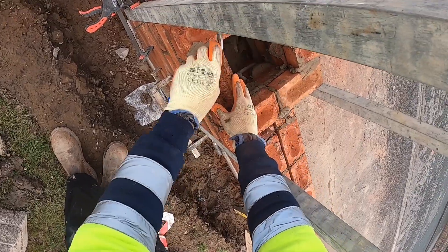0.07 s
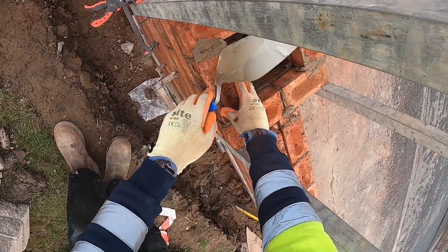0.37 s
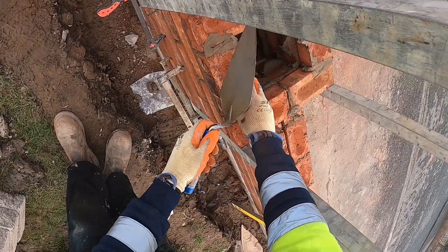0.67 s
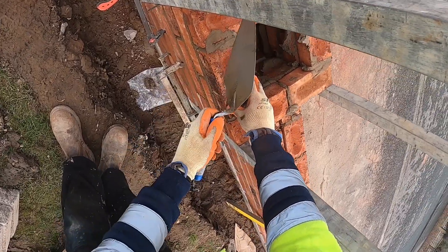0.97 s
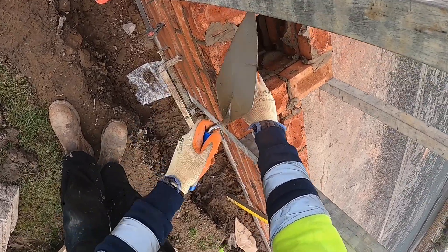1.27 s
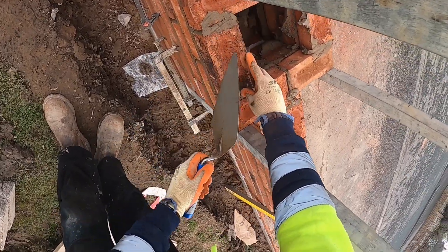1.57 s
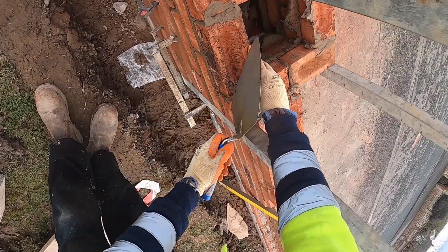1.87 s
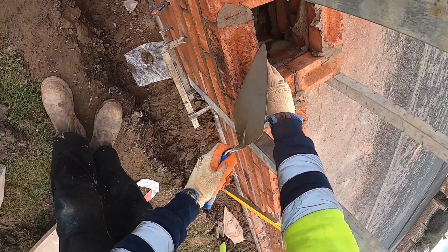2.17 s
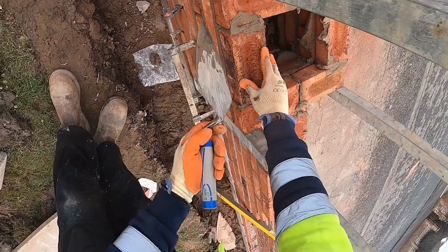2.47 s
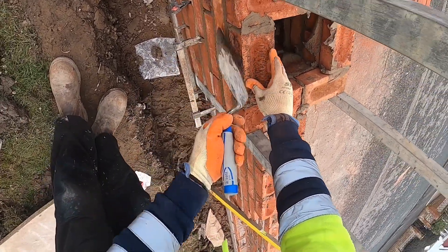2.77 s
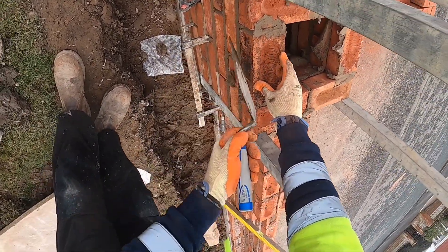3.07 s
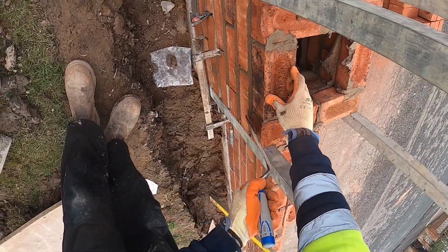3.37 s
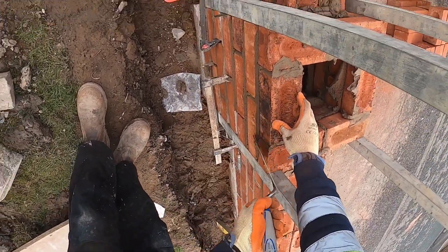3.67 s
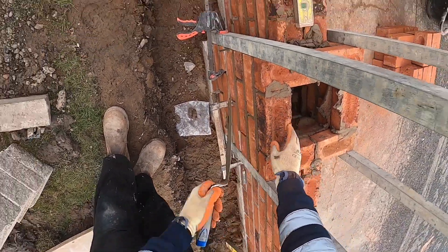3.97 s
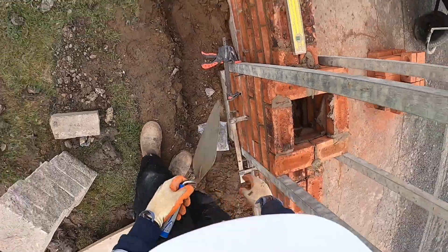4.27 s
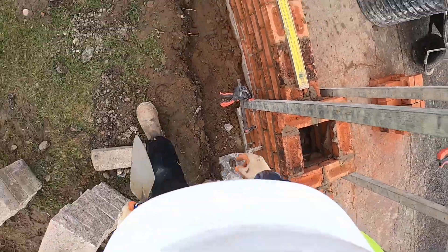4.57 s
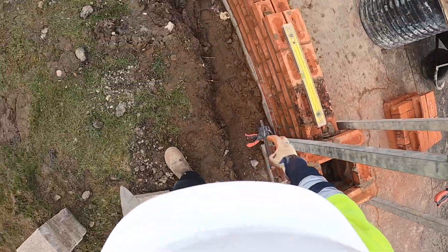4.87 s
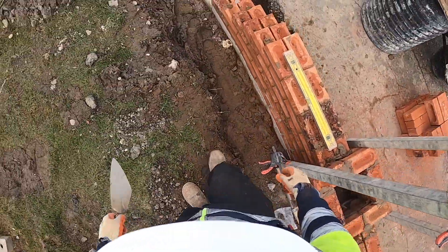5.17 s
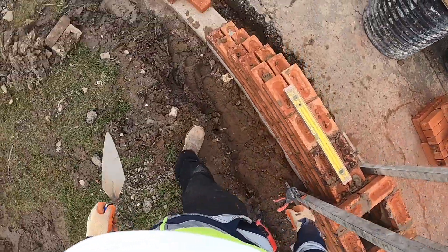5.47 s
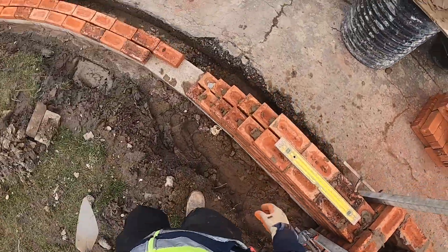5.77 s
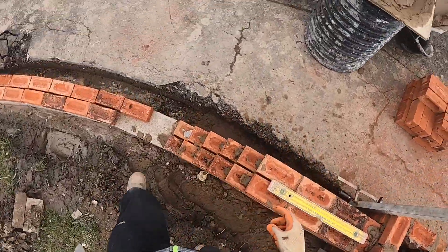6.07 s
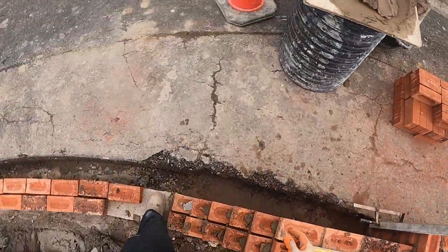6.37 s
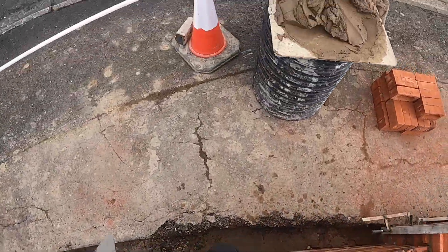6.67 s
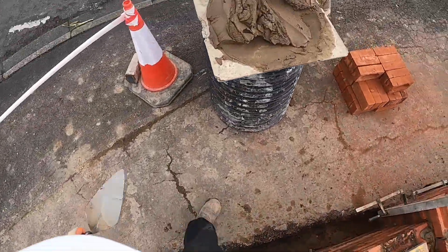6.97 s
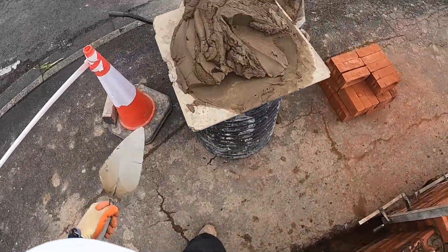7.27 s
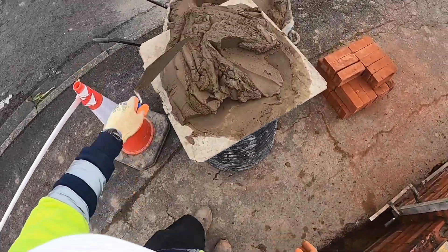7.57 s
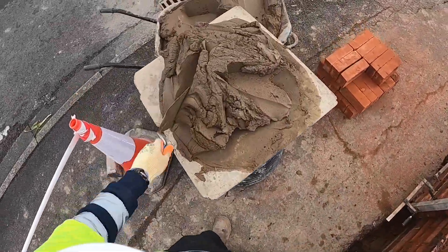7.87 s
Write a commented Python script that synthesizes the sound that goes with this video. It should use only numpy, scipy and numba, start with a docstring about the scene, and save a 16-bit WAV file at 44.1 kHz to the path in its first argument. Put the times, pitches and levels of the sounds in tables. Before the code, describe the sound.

An outdoor building site is heard from a body-worn microphone, with a low rumble of air and faint distant traffic throughout. After a soft rustle of clothing, a steel trowel taps a brick close by at about 0.9 and 1.1 seconds, then more lightly at 1.9 and 2.1, the blade ringing brightly each time. A small bird chirps faintly three times between 0.8 and 2.4 seconds. Three short, gritty scrapes of steel on brick and sandy mortar come at 2.7, 3.2 and 3.6 seconds, each swelling and then lifting off. A dry knock follows near 4 seconds. From about 4.8 seconds the worker walks, with five dull, low footfalls, the heaviest near 6.4. Grit crunches lightly, small stones and bricks knock, clothes rub and a few faint squeaks pass. Near 7.8 seconds there is a small knock and a very faint sandy crackle as the trowel enters mortar.

```python
"""Four ringing taps: a steel trowel's edge knocks a brick down and the free blade rings on.
Three gritty strokes follow, the edge catching and slipping on sand as it scrapes off spare mortar.
The bricklayer walks to the mortar board: grit crunches, small things knock, clothes rub.
Air and footfalls rumble in the body-worn microphone; distant traffic and a small bird lie behind."""
import sys
import numpy as np
from scipy import signal
from scipy.fft import rfft, irfft, next_fast_len
from scipy.io import wavfile
from numba import njit

SR = 44100
rng = np.random.default_rng(int(sys.argv[2]) if len(sys.argv) > 2 else 0)


def to_wav(sig):
    """Store sig (one row per channel, or 1-D mono) as 16-bit WAV at the path in sys.argv[1].

    Samples outside -1..1 are clipped; the rate is SR.
    """
    pcm = np.clip(np.atleast_2d(sig), -1, 1) * 32767
    pcm = np.round(pcm).astype(np.int16)
    wavfile.write(sys.argv[1], SR, pcm.T)  # frames by channels


N = 353682
T = np.arange(N) / SR

# free blade modes: f/Hz, t60/s, level/dB struck at heel, middle, tip
BLADE_MODES = [(481, 1.7, -49.5, -49, -61), (809, 1.1, -78, -55.5, -75.5), (1045, 0.28, -43.5, -35, -34.5),
               (1210, 0.36, -36, -40, -63), (1237, 0.38, -33, -32, -41), (1293.4, 1.04, -33.5, -40, -27),
               (1470, 0.15, -40.5, -17.5, -29.5), (1610, 0.14, -53, -55, -42),
               (1905, 0.19, -30, -34.5, -57), (1950, 0.23, -24.5, -27, -51.5),
               (2173, 0.19, -27.5, -31.5, -38), (2235, 0.58, -40, -45, -45.5),
               (2418, 0.45, -31.5, -43, -33), (2453, 0.56, -50.5, -41.5, -38),
               (2507, 0.23, -27, -38.5, -50), (2875, 0.36, -55, -45, -60), (3130, 0.17, -24.5, -40, -58.5),
               (3173, 0.28, -42.5, -37, -27.5), (3470, 0.12, -57, -51, -56), (3735, 0.22, -47, -45, -39),
               (4050, 0.26, -62, -55.5, -37.5), (4740, 0.16, -54, -46, -51), (4650, 0.24, -56, -49, -60),
               (4660, 0.077, -52, -44, -27.5), (5087, 0.05, -61.5, -53, -44), (5320, 0.13, -44, -38.5, -63),
               (6700, 0.14, -62.5, -61, -50), (6830, 0.087, -46, -37, -36.5), (6934, 0.11, -51, -53, -45),
               (7600, 0.08, -40.5, -50, -49), (8800, 0.11, -49, -67, -53)]
# trowel taps: t/s, place (0 heel, 2 tip), ring/dB, knock/dB
TROWEL_TAPS = [(0.8981, 0.29, -1, -16.5), (1.1027, 0.97, 1, -15), (1.9481, 1.73, -4.5, -19),
               (2.109, 1.34, -12, -24)]
# steel on brick: f/Hz, level/dB
KNOCK_SPECTRUM = [(100, -13), (250, -16.5), (380, -30), (510, 8), (700, -22.5), (1050, 8.5), (1500, 12.5),
                  (1850, 4), (2700, -10), (4500, -25.5), (8000, -65.5), (15000, -60.5)]
# crushed sand: f/Hz, level/dB
GRIT_SPECTRUM = [(200, -35), (800, -16), (2000, -6), (2750, -6.5), (3300, 13.5), (5200, 4), (7000, -1.5),
                 (8500, -11), (9600, -11.5), (12500, -19.5), (15000, -34.5)]
# brick in its soft bed: f/Hz, level/dB
THUD_SPECTRUM = [(90, -15), (230, 2.5), (380, -13.5), (520, 8), (700, -23), (1500, -40), (6000, -46)]
# edge skids or cuts into mortar: start/s, end/s, level/dB
EDGE_SKIDS = [(2.11, 2.161, -49), (7.81, 8.026, -64.5)]
# scrapes: t/s, push/s, ease/s, peak/dB, swell/dB, sand/dB re pressure, chatter/Hz
SCRAPE_STROKES = [(2.7, 0.14, 0.095, -26, 12, -7, 1700), (3.206, 0.13, 0.06, -27, 14.5, -8, 1760),
                  (3.592, 0.1, 0.032, -28.5, 21.5, -12, 1520)]
# blade damped against the wall: f/Hz, width/Hz, level/dB
PRESSED_MODES = [(516, 52, -13), (1086, 95, -3), (1362, 29, -4.5), (1490, 41, -5), (1774, 200, -3.5),
                 (1927, 59, 3.5), (2440, 130, 0.5), (3155, 170, -2), (3528, 110, -2.5)]
# its upper modes, rung by sharp sand: f/Hz, width/Hz, level/dB
UPPER_MODES = [(4300, 70, 7), (4398, 150, 10.5), (4657, 75, 15), (5084, 120, 9.5), (6820, 220, 5.5),
               (7540, 76, -10.5), (7910, 120, -5.5), (8450, 120, -2)]
# rasp of the brick face: f/Hz, level/dB
RASP_SPECTRUM = [(110, -27), (220, -19), (370, -34), (520, -24), (650, -23.5), (830, -25), (1000, 3),
                 (1800, 3), (2200, -28), (2480, 3), (2750, -22), (3200, 2.5), (6000, -13), (15000, -46)]
# knocks of brick, stones, boots: t/s, level/dB, treble/dB re level
SMALL_KNOCKS = [(0.305, -44, -17), (1.594, -38.5, -35), (3.95, -27.5, -37.5), (5.624, -33, -27.5),
                (5.71, -37, -30.5), (5.975, -43.5, -36), (6.109, -32.5, -38.5), (6.414, -28, -21.5),
                (6.62, -38.5, -35), (6.921, -43.5, -29), (6.975, -37, -24.5), (7.13, -43, -16),
                (7.348, -41.5, -44.5), (7.514, -46.5, -33), (7.608, -44, -37), (7.816, -33, -15.5)]
# footfalls: t/s, jolt/dB, length/s, crunch/dB
FOOTFALLS = [(4.783, -22.5, 0.11, -56.5), (5.6, -11.5, 0.11, -56), (6.415, -8.5, 0.079, -51.5),
             (7.118, -11.5, 0.062, -63.5), (7.712, -16.5, 0.084, -64)]
# gloves, sleeves, trousers: t/s, length/s, level/dB, treble/dB re level
CLOTH_SWISHES = [(-.15, 0.48, -56.5, -4), (0.288, 0.27, -63, -5.5), (3.769, 0.35, -58.5, -9.5),
                 (4.214, .4, -54.5, -12.5), (4.721, 0.3, -57, -14), (5.274, 0.13, -60.5, -17.5),
                 (5.601, .21, -54, -10.5), (6.127, 0.78, -58.5, -10), (6.79, 0.45, -58.5, -15.5),
                 (7.251, 0.047, -52, -13.5), (7.646, 0.059, -52.5, -8.5), (7.694, 0.44, -56, -6.5)]
# fabric rub: f/Hz, level/dB
RUB_SPECTRUM = [(120, -1.5), (350, -28), (510, -2), (760, -24), (1020, -1), (1550, 3), (2000, -10.5),
                (2600, -20), (5000, -60)]
# fabric treble: f/Hz, level/dB
SWISH_SPECTRUM = [(1000, -29.5), (2000, 2.5), (2700, 0.5), (3300, 8), (4000, -6.5), (4800, -3.5),
                  (6500, -28.5), (9000, -37.5), (15000, -61)]
# faint squeaks and whines: t/s, length/s, start/Hz, end/Hz, level/dB
SQUEAKS = [(1.769, 0.039, 3360, 3050, -64), (4.55, 0.21, 2560, 2360, -64.5), (5.66, 0.07, 937, 940, -44),
           (6.2, 0.41, 1565, 1472, -57.5), (6.725, .1, 3500, 3190, -52.5), (7.5, 0.46, 1490, 1270, -51.5)]
# air on the microphone: f/Hz, level/dB
AIR_SPECTRUM = [(12, -3), (24, 5.5), (38, 0.5), (50, -14.5), (66, -10.5), (80, -29.5), (100, -42.5),
                (160, -43.5), (300, -71), (700, -92.5)]
# bird calls: t/s, level/dB
CALLS = [(0.794, -54.5), (1.601, -56.5), (2.349, -58.5)]
# two falling notes per call: delay/s, length/s, start/Hz, end/Hz, level/dB re call
BIRD_NOTES = [(0, .034, 4500, 3920, -9), (0.035, 0.047, 3575, 3074, -1)]
# distant road: f/Hz, level/dB
TRAFFIC_SPECTRUM = [(60, 13.5), (130, -1), (220, -2), (370, -10.5), (510, -7), (760, -18.5), (1030, -3.5),
                    (1300, -1.5), (1540, 5.5), (1900, -8), (2500, -18), (3300, -14.5), (4000, -24.5),
                    (5000, -24.5), (8000, -43), (15000, -63.5)]
# wall backscatter: f/Hz, level/dB
WALL_SCATTER = [(300, -11.5), (1500, -11), (4000, -7), (9000, -2.5)]
# microphone ports: f/Hz, left minus right/dB
PORT_BALANCE_DB = [(100, -2), (450, -4), (750, 4.5), (1100, -1.5), (1300, 0.5), (1480, 1.5), (1750, 1),
                   (1950, 2.5), (2150, 11), (2450, 4), (2800, 13.5), (3150, 4.5), (3650, 14), (3950, -13),
                   (4750, -4.5), (7200, -10), (9000, 3)]
# microphone ports: f/Hz, left lead/rad
PORT_LEAD_RAD = [(100, 1), (1900, -0.64), (2250, -1.67), (3200, 0), (4130, -7.5), (6700, -8.5),
                 (9100, -15.5), (15000, -20)]


def taps():
    """The edge knocks, bounces, chatters and crushes sand; the brick thuds, the free blade rings."""
    chatter_db, chatter_t60_s, crush_db, crush_t60_s = -9, 0.095, -17.5, 0.067
    out = np.zeros(N)
    chatter = unit(colour(grains(rate_hz=1500, spread_db=5), KNOCK_SPECTRUM))
    grit = unit(colour(grains(rate_hz=6500, spread_db=4.5), GRIT_SPECTRUM))
    thud = unit(colour(noise(), THUD_SPECTRUM))
    knock = pulse(KNOCK_SPECTRUM)
    sand = skids()
    for at_s, place, ring_db, knock_db in TROWEL_TAPS:
        add(out, at_s, undb(ring_db) * blade_ring(at_s, place))
        for bounce, delay_s in enumerate(np.cumsum([0, *rng.uniform(0.0016, 0.0045, size=3)])):
            add(out, at_s + delay_s, undb(knock_db - 4.1 * bounce) * knock)
        out += undb(knock_db + chatter_db) * chatter * fade(at_s, chatter_t60_s)
        out += undb(0.23 * ring_db - 42.5) * thud * fade(at_s, t60_s=0.16)
        sand += undb(knock_db + crush_db) * grit * fade(at_s, crush_t60_s)
    sand_ring = signal.fftconvolve(sand, shimmer(count=45))[:N]
    return out + undb(-5.5) * sand + undb(-12) * sand_ring


def blade_ring(at_s, place):
    """Modes weighted by strike place; they build during the bounces, the next tap stills them."""
    build_s, still_s = 0.0036, 0.0044
    ring, t = 0, T[:2 * SR]
    for hz, t60_s, *levels_db in BLADE_MODES:
        gain = undb(np.interp(place, [0, 1, 2], levels_db))
        ring += gain * np.exp(-np.log(1000) * t / t60_s) * np.sin(2 * np.pi * (hz * t + rng.random()))
    ring *= 1 - np.exp(-t / build_s)
    for tap_s, *_ in TROWEL_TAPS:
        if tap_s > at_s:
            ring *= 1 - np.clip((at_s + t - tap_s) / still_s, 0, 1)
    return ring


def shimmer(count):
    """High, short-lived blade modes; unit energy."""
    t, t60_s = T[:SR // 4], 0.14
    hz, phase = rng.uniform(3000, 9500, (count, 1)), rng.random((count, 1))
    modes = np.sin(2 * np.pi * (hz * t + phase)).sum(axis=0)
    return unit_energy(modes * np.exp(-np.log(1000) * t / t60_s))


def skids():
    """Light contact: sand crackles under the steel."""
    edge_s = 0.0065
    gain = sum(undb(db) * np.clip(np.minimum(T - start_s, end_s - T) / edge_s + 1, 0, 1)
               for start_s, end_s, db in EDGE_SKIDS)
    return gain * unit(colour(grains(rate_hz=790, spread_db=5), GRIT_SPECTRUM))


def scrapes():
    """The edge catches and slips on sand, driving the pressed blade; the brick rasps and groans."""
    chatter_width_hz, groan_hz, groan_width_hz = 350., 210, 40
    surge = undb(2.5 * walk(170) + 1.5 * walk(45))
    slips = grains(rate_hz=3500, spread_db=2) * surge
    pressure, sand_gain, groan_gain, chatter_hz = strokes()
    drive = slips + 2.2 * resonate(slips, chatter_hz, chatter_width_hz)
    low = undb(-1.4) * ringing(drive, PRESSED_MODES) + undb(-2) * unit(colour(drive, RASP_SPECTRUM))
    high = unit(ringing(slips, UPPER_MODES) + unit(colour(slips, GRIT_SPECTRUM)))
    high *= undb(2.6 * walk(70))
    groan = ringing(slips, [(groan_hz, groan_width_hz, 0)])
    return pressure * low + sand_gain * high + groan_gain * groan


def strokes():
    """Gains and chatter pitch as the edge lands with a bump, pushes, eases off and lifts."""
    bump_s, bump_share, ease_db, lift_t60_s = 0.014, 0.42, 7, 0.09
    gather_db, groan_db = 3.5, -28.5  # sand gathers along the stroke
    landing_flat, lift_flat = 0.037, 0.24  # fractional pitch drops
    pressure, sand, groan, chatter_hz = 0, 0, 0, SCRAPE_STROKES[0][-1]
    for at_s, push_s, ease_s, peak_db, swell_db, sand_db, hz in SCRAPE_STROKES:
        slack, ease = 1 - ramp(at_s, push_s), ramp(at_s + push_s, ease_s)
        lift_s = at_s + push_s + ease_s
        bump = bump_share * (1 - ramp(at_s, bump_s) ** 2)
        contact = ramp(at_s - 0.002, 0.0036) * np.where(T < lift_s, 1, fade(lift_s, lift_t60_s))
        gain = contact * undb(peak_db - swell_db * (slack - bump) - ease_db * ease ** 2)
        pressure += gain
        sand += gain * undb(sand_db + gather_db * ramp(at_s, push_s + ease_s))
        groan += gain * ease * undb(groan_db)
        stroke_hz = hz * (1 - landing_flat * slack - lift_flat * ease ** 2)
        chatter_hz = np.where(T < at_s, chatter_hz, stroke_hz)
    return pressure, sand, groan, chatter_hz


def ringing(force, modes):
    """Steep resonances that drift and swell as the contact slides; rms 1."""
    out = 0
    for hz, width_hz, db in modes:
        centre_hz = hz * (1 + 0.005 * walk(12))
        band = resonate(force, centre_hz, 1.66 * width_hz)
        out += undb(db + 2.6 * walk(16)) * resonate(band, centre_hz, 1.34 * width_hz)
    return unit(out)


def small_knocks():
    """Brick, stones and boots knock dryly, crumble and rock back once."""
    rebound_s, rebound_db = 0.025, -9
    dull, sharp = np.zeros(N), np.zeros(N)
    crumbs = grains(rate_hz=1500, spread_db=2.5)
    for at_s, db, treble_db in SMALL_KNOCKS:
        force = 0.069 * crumbs * fade(at_s, t60_s=0.06)
        force[int(at_s * SR)] += 1
        force[int((at_s + rebound_s) * SR)] += undb(rebound_db)
        dull += undb(db) * force
        sharp += undb(db + treble_db) * force
    body = signal.fftconvolve(dull, pulse(KNOCK_SPECTRUM))[:N]
    return body + undb(11.5) * signal.fftconvolve(sharp, pulse(GRIT_SPECTRUM))[:N]


def crunches():
    """Grit gives way under each boot and settles."""
    load = sum(undb(db) * ramp(at_s, 0.0094) * fade(at_s, t60_s=0.51) for at_s, _, _, db in FOOTFALLS)
    force = load * grains(rate_hz=270, spread_db=7.5)
    grain = unit_energy(pulse(KNOCK_SPECTRUM)) + undb(-14.5) * unit_energy(pulse(GRIT_SPECTRUM))
    return signal.fftconvolve(force, grain)[:N]


def clothes():
    """Fabric rubs in uneven swishes as the worker moves."""
    rub = unit(colour(grains(rate_hz=2700, spread_db=1.5), RUB_SPECTRUM)) * undb(4.2 * walk(35))
    swish = unit(colour(grains(rate_hz=5000, spread_db=4), SWISH_SPECTRUM))
    out = 0
    for at_s, length_s, db, treble_db in CLOTH_SWISHES:
        progress = ramp(at_s, length_s)
        arch = np.sqrt(4 * progress * (1 - progress))
        out += undb(db) * arch * (rub + undb(treble_db) * swish)
    return out


def glides(table, waver):
    """Thin gliding tones; pitch wavers by the given fraction."""
    out, wander = np.zeros(N), walk(400)
    for at_s, length_s, start_hz, end_hz, db in table:
        progress = ramp(at_s, length_s)
        hz = (start_hz + (end_hz - start_hz) * progress) * (1 + waver * wander)
        out += undb(db) * np.sin(np.pi * progress) * np.sin(2 * np.pi * np.cumsum(hz) / SR)
    return out


def rumble():
    """Air eddies at the microphone, stirred by each step; heel and toe rock it and thud."""
    air_db, stir_db, stir_t60_s = -37.5, -7, 0.68
    jolt_hz, toe_lag_s, toe_db = 31.26, 0.078, -11.5
    stir = sum(undb(db + stir_db) * ramp(at_s, length_s) * fade(at_s, stir_t60_s)
               for at_s, db, length_s, _ in FOOTFALLS)
    out = np.hypot(undb(air_db + 4.5 * walk(3)), stir) * wide(AIR_SPECTRUM, side=0.072)
    thud = unit(colour(noise(), [(25, -2.5), (60, 12.5), (100, -10), (150, -17.5),
                                 (300, -36), (800, -43), (3000, -84.5)]))
    for heel_s, heel_db, length_s, _ in FOOTFALLS:
        for at_s, db in (heel_s, heel_db), (heel_s + toe_lag_s, heel_db + toe_db):
            swell = np.sin(np.pi * ramp(at_s, length_s))
            jolt = np.sin(2 * np.pi * jolt_hz * (T - at_s))
            out += undb(db) * swell * (jolt + undb(-3.5) * fade(at_s, t60_s=0.24) * thud)
    return out * undb([[0.5], [-0.5]])


def bird():
    """A small bird repeats a two-note call some way off."""
    song = [(at_s + delay_s, length_s, start_hz, end_hz, db + note_db)
            for at_s, db in CALLS for delay_s, length_s, start_hz, end_hz, note_db in BIRD_NOTES]
    return echoes(glides(song, waver=0.06), t60_s=0.11)


def traffic():
    """Distant road, near steady but for one lull."""
    road_db, lull_db, lull_at_s, lull_width_s = -57, -5, 7.53, 0.96
    lull = np.exp(-((T - lull_at_s) / lull_width_s) ** 2)
    return undb(road_db + lull_db * lull + 0.5 * walk(2.7)) * wide(TRAFFIC_SPECTRUM, side=0.53)


def echoes(x, t60_s):
    """Scatter from wall and ground, different per channel."""
    tail = rng.standard_normal((2, SR // 2)) * fade(0.0022, t60_s)[:SR // 2]
    return signal.fftconvolve(x[None], unit_energy(tail), axes=1)[:, :N]


def ports(x):
    """Two microphone ports colour and delay near sound differently."""
    size = next_fast_len(N)
    hz = np.fft.rfftfreq(size, 1 / SR)
    ratio = undb(np.interp(hz, *np.transpose(PORT_BALANCE_DB)))
    lag = np.exp(-1j * np.interp(hz, *np.transpose(PORT_LEAD_RAD)))
    spectrum = rfft(x, size) * np.sqrt(2 / (1 + ratio ** 2))
    return irfft(spectrum * np.array([ratio, lag]), size)[:, :N]


def undb(db):
    """dB to gain."""
    return 10 ** (np.asarray(db) / 20)


def unit(x):
    """Scale to rms 1."""
    return x / np.sqrt(np.mean(x ** 2))


def unit_energy(x):
    """Scale each channel to energy 1."""
    return x / np.sqrt(np.sum(x ** 2, axis=-1, keepdims=True))


def noise():
    """White noise."""
    return rng.standard_normal(N)


def wide(points, side):
    """Coloured stereo noise, mostly mid."""
    mid, apart = (unit(colour(noise(), points)) for _ in range(2))
    return mid + side * apart * np.array([[1], [-1]])


def walk(rate_hz):
    """Random wander, spread near 1."""
    knots_s = np.arange(0, T[-1] + 1, 1 / rate_hz)
    return 1.1 * np.interp(T, knots_s, noise()[:len(knots_s)])


def grains(rate_hz, spread_db):
    """Random tiny impacts, a few much larger; rms 1."""
    sizes = undb(spread_db * np.minimum(rng.exponential(size=N), 4))
    return unit((rng.random(N) < rate_hz / SR) * np.sign(noise()) * sizes)


def ramp(start_s, length_s):
    """Linear rise, 0 to 1."""
    return np.clip((T - start_s) / length_s, 0, 1)


def fade(start_s, t60_s):
    """Sudden start, exponential decay."""
    gate = (T >= start_s) & (T < start_s + 2 * t60_s)
    return gate * np.exp(-np.log(1000) * np.clip(T - start_s, 0, 2 * t60_s) / t60_s)


def colour(x, points):
    """Minimum-phase filter through (f/Hz, level/dB) points."""
    hz, db = np.transpose(points)
    size = 2 ** 14
    bins_hz = np.maximum(np.fft.rfftfreq(size, 1 / SR), 1)
    cepstrum = irfft(np.log(undb(np.interp(np.log(bins_hz), np.log(hz), db))))
    cepstrum[1:size // 2] *= 2
    cepstrum[size // 2 + 1:] = 0
    return signal.fftconvolve(x, irfft(np.exp(rfft(cepstrum))))[:len(x)]


@njit
def resonate(x, hz, width_hz):
    """State-variable band-pass with a moving centre."""
    y, band, low = np.empty(len(x)), 0., 0.
    for i in range(len(x)):
        g, damping = np.pi * hz[i] / SR, width_hz / hz[i]
        g = g + g ** 3 / 3 + 2 * g ** 5 / 15  # ~tan(g)
        v = (band + g * (x[i] - low)) / (1 + g * (g + damping))
        band, low, y[i] = 2 * v - band, low + 2 * g * v, damping * v
    return y


def pulse(points):
    """One short coloured contact, peak 1."""
    shape = colour(signal.unit_impulse(SR // 20), points)
    return shape / np.abs(shape).max()


def add(out, start_s, sound):
    """Mix in a short sound."""
    i = int(start_s * SR)
    out[i:i + len(sound)] += sound[:max(N - i, 0)]


def scene():
    """Near work and movement over the open-air background."""
    near = taps() + scrapes() + small_knocks() + crunches() + clothes() + glides(SQUEAKS, waver=0.035)
    site = echoes(colour(near, WALL_SCATTER), t60_s=0.03) + undb(-29.5) * echoes(near, t60_s=0.36)
    return ports(near) + site + traffic() + bird() + rumble()


def record(dry):
    """Steep low-pass."""
    top_hz = 15000
    return signal.sosfilt(signal.ellip(8, 0.2, 70, top_hz, fs=SR, output="sos"), dry)


dry = scene()
out = record(dry)
to_wav(out)
```